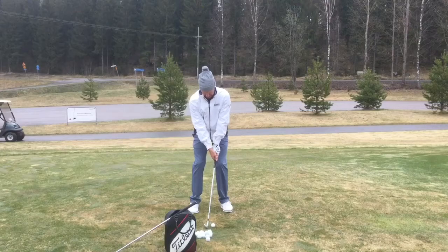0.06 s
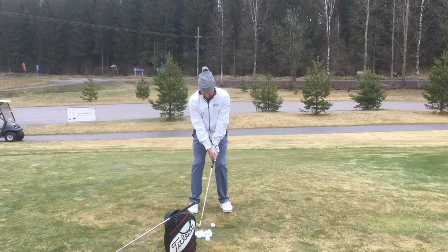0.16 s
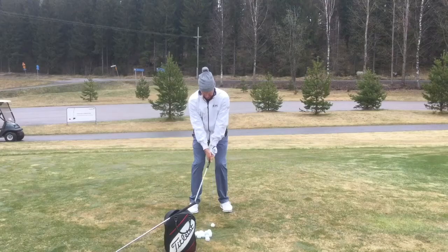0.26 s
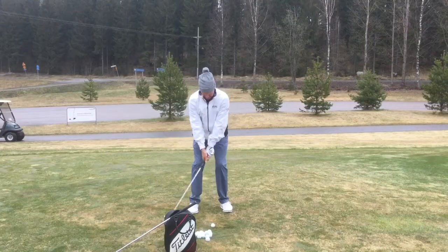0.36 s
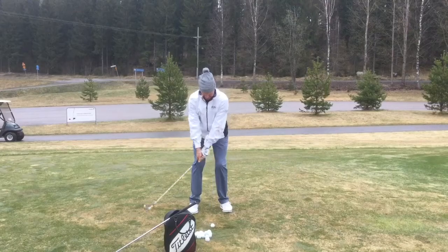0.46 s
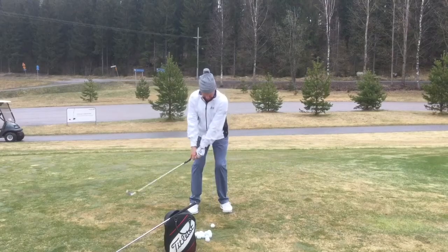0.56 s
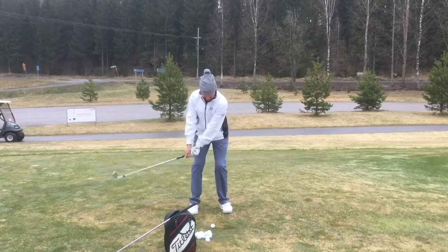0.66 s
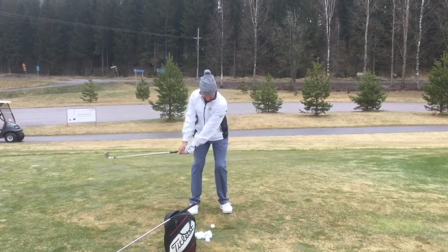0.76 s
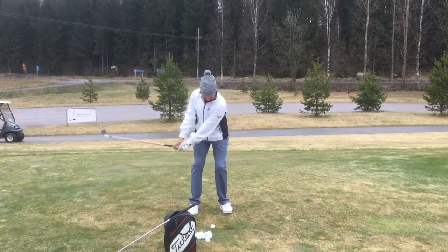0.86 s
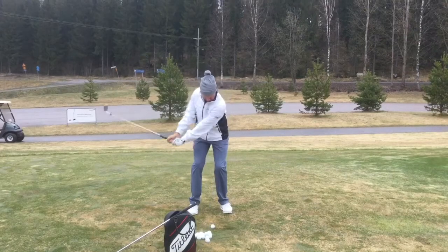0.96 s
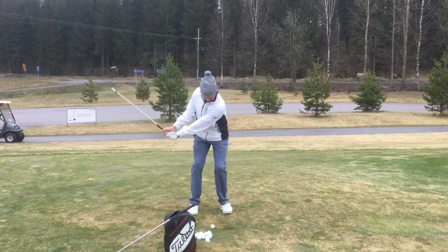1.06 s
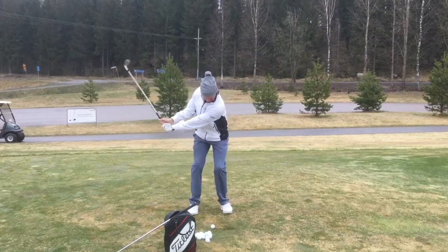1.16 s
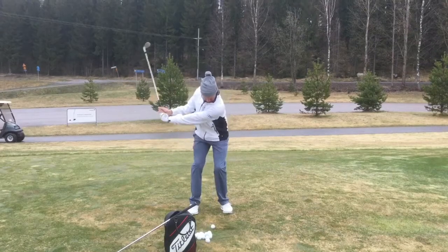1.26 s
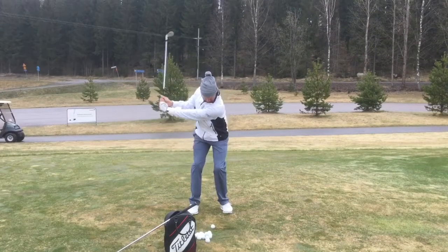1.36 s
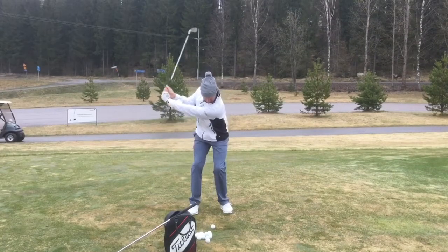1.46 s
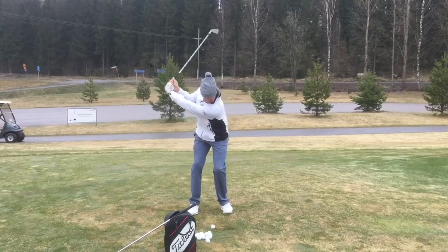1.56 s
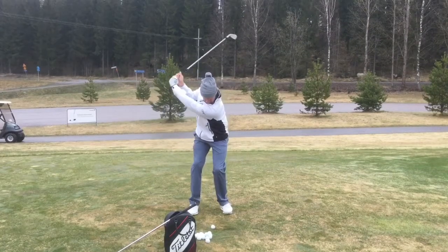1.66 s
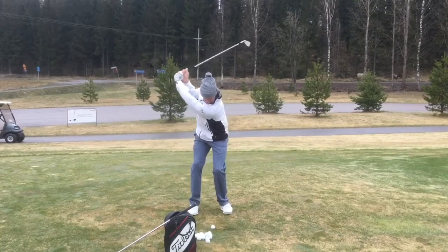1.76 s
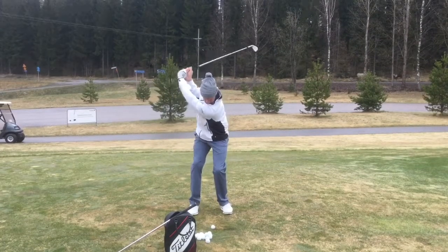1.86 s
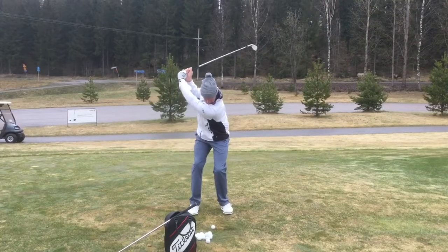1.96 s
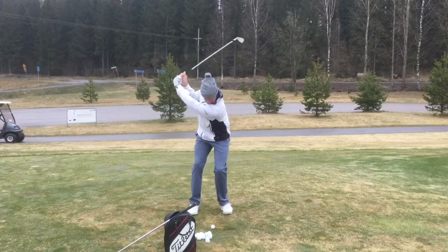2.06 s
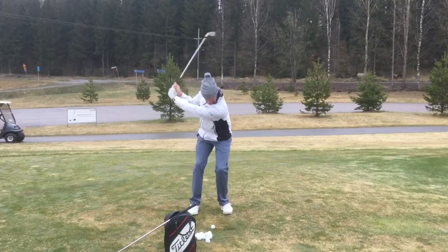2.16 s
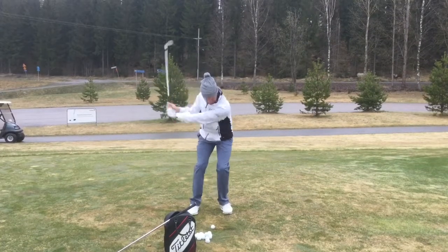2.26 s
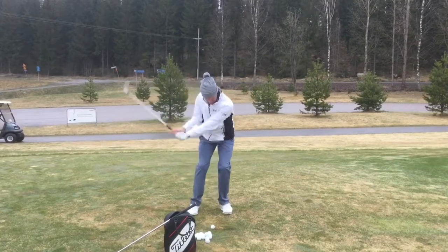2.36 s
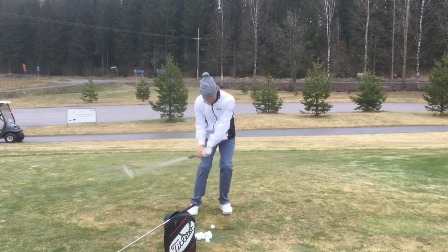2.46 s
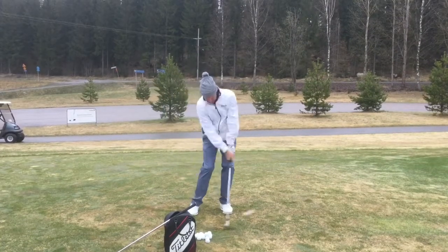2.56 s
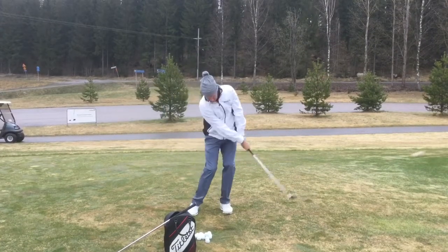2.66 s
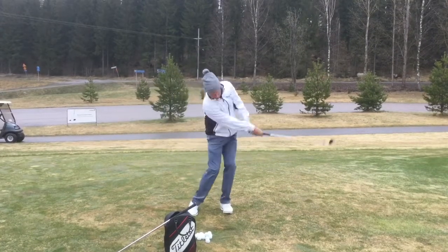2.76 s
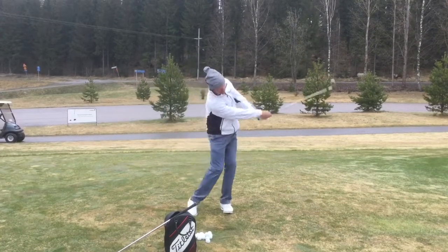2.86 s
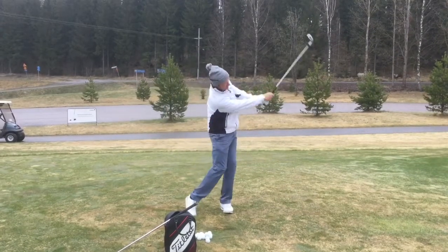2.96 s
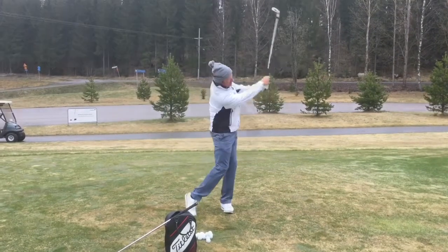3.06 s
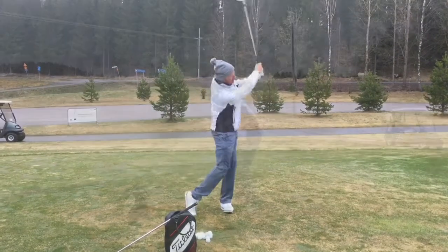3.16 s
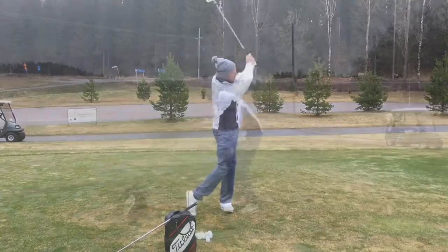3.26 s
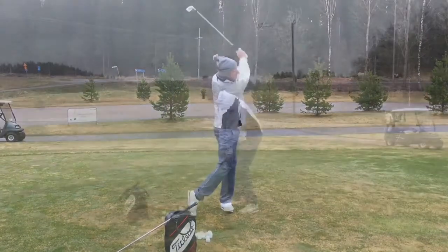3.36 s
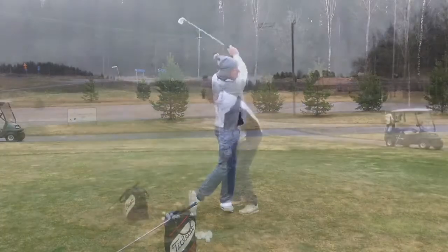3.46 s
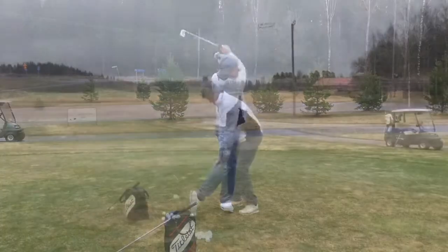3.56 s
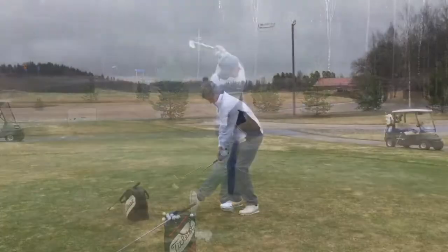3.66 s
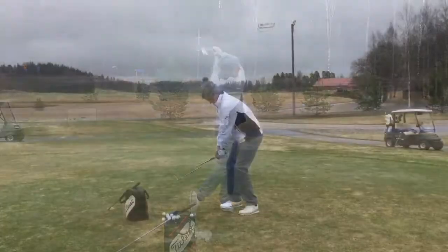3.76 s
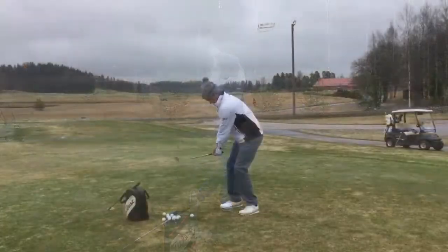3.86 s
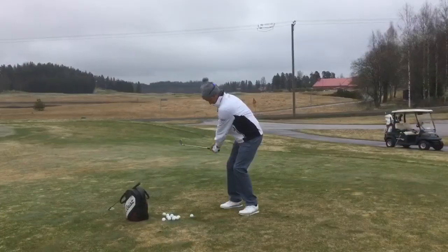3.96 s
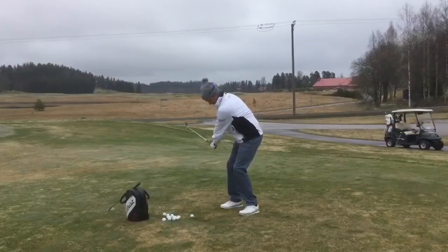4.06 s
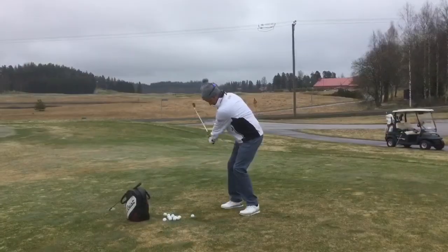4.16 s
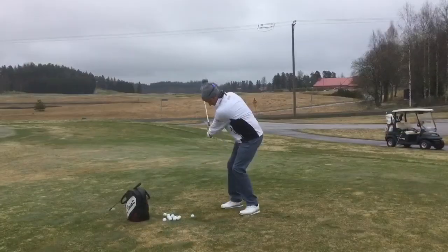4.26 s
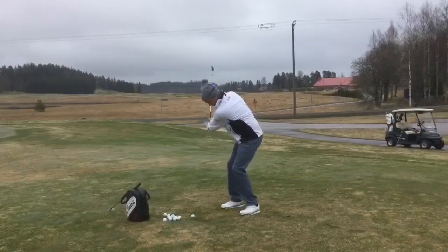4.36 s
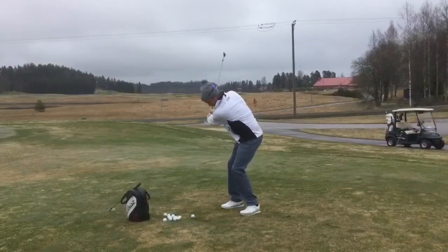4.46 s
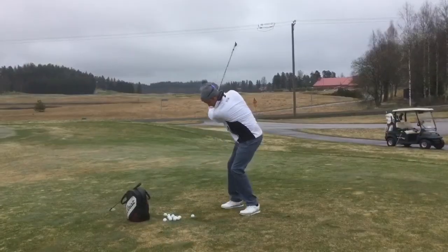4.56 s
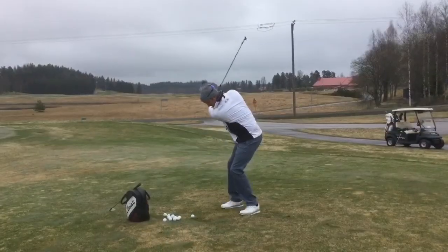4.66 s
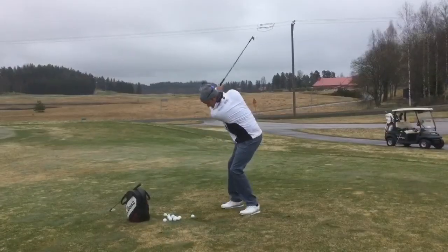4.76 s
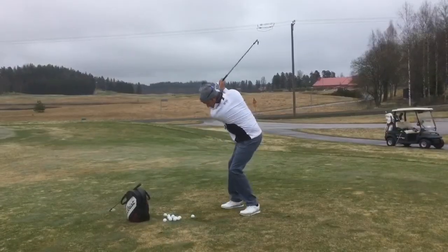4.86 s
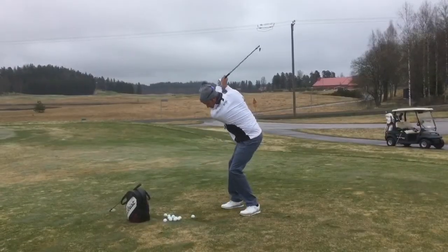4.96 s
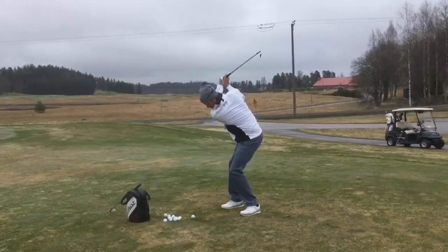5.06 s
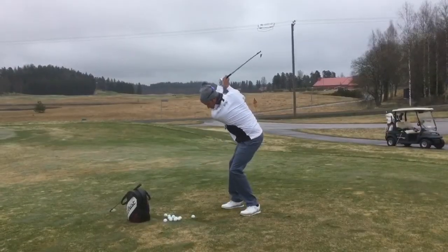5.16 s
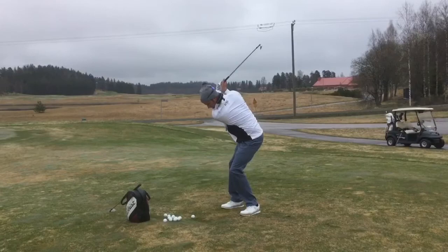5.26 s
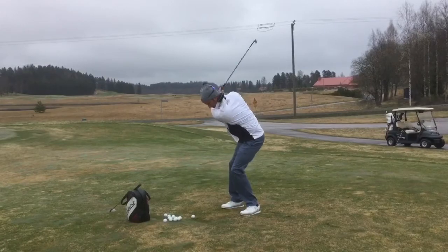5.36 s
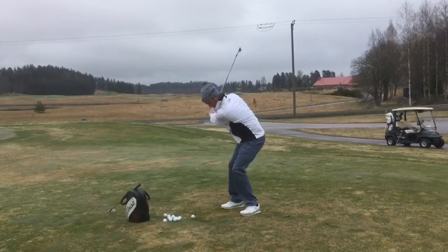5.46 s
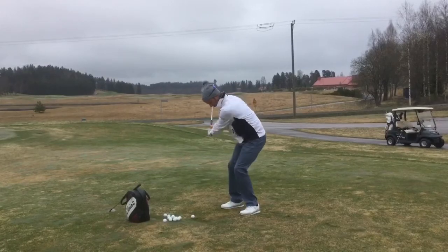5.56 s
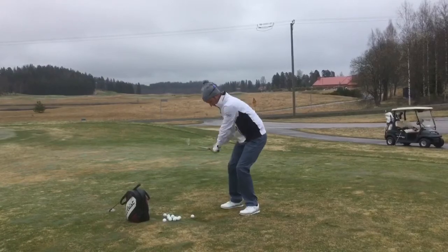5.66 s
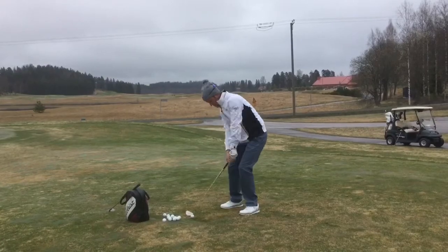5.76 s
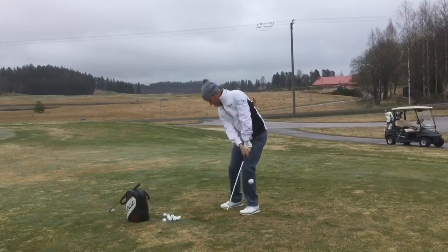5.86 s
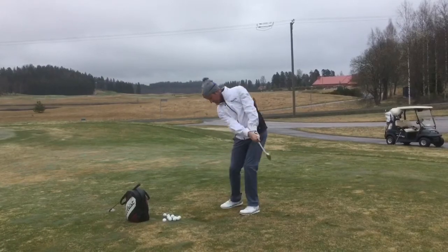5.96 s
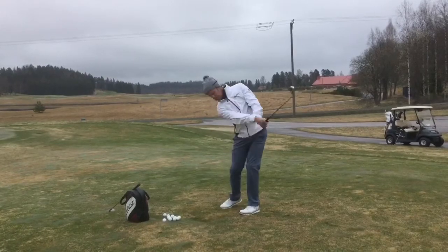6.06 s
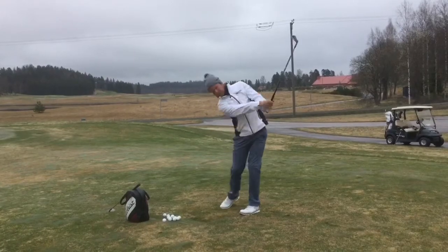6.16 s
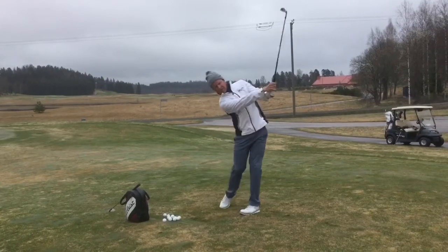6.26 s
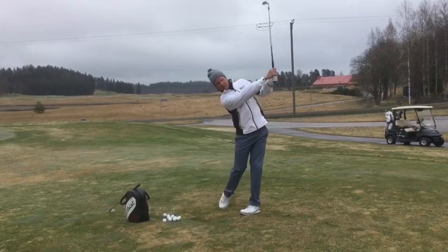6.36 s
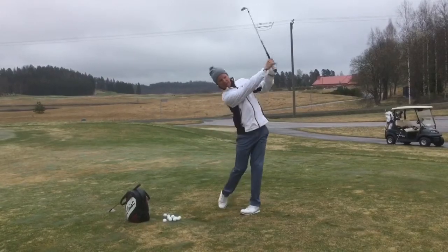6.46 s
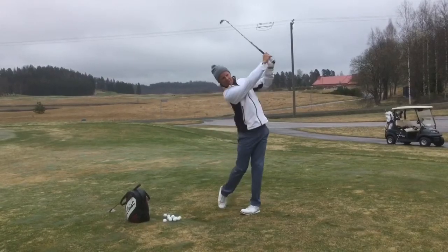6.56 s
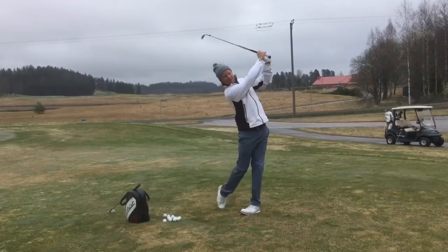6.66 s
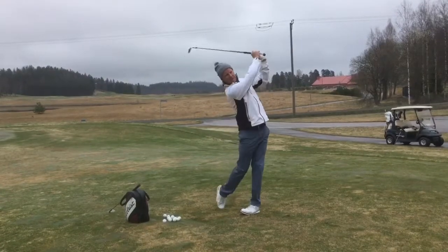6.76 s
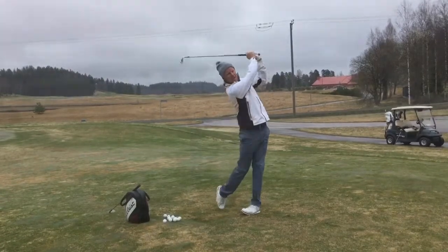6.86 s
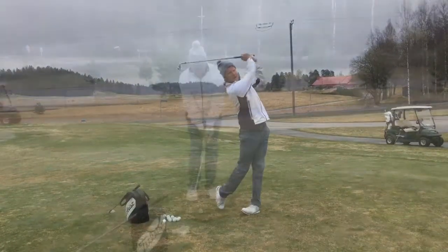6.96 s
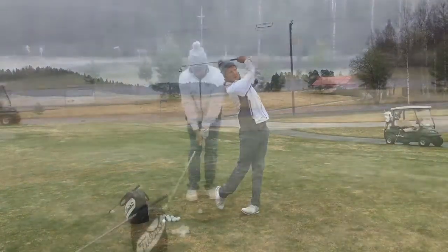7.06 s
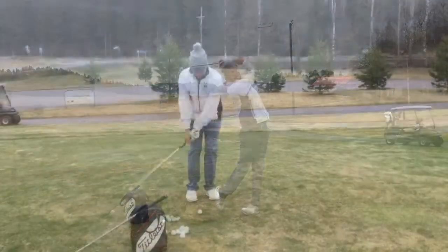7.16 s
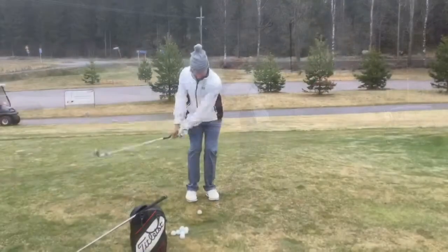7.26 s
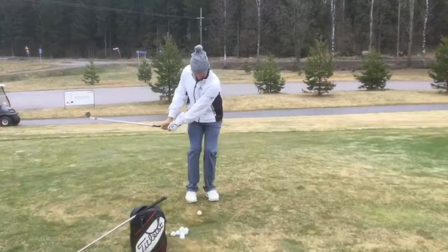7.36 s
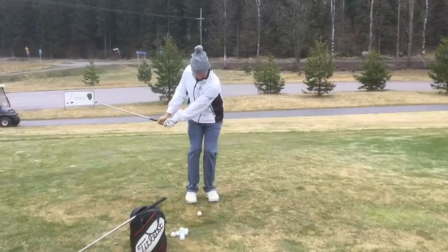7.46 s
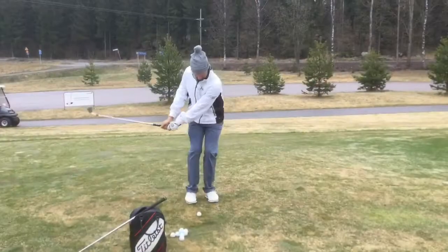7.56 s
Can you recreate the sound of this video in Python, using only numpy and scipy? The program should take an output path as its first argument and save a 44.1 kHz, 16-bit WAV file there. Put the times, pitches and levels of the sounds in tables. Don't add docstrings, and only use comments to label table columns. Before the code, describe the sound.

After a very brief silence the sound fades in on an open golf range: a close songbird pours out rapid slurs, chips and buzzy notes until about 1.5 s, while wind bumps the microphone in irregular low thumps over soft hiss and clothing rustle. At 1.85 s a neighbour's shot cracks, smaller and further off. Sparse distant bird notes follow. A swish and brief grass scuff lead to a near iron strike at 2.66 s: sharp ringing crack, turf thud, short echoes. From 3.05 to 4.15 s wind gives way to a steady low engine drone, deep rumble and swelling tyre roar, with faint high bird ticks. A tiny distant tick at 5.73 s precedes a scuff and the loudest snap at 5.89 s, drier and fuller, with quick echoes. From 6.9 s traffic fades to a quieter distant hush, and faint bird chirps return until the end near 7.6 s.

```python
import sys
import numpy as np
from scipy import signal
from scipy.io import wavfile
from scipy.ndimage import uniform_filter1d

SR = 44100
rng = np.random.default_rng(int(sys.argv[2]) if len(sys.argv) > 2 else 0)


def gain_from_db(level_db):
    decades = np.asarray(level_db, float) / 20
    return 10 ** decades


def store_wav(level_fs):
    pcm = np.round(np.clip(np.atleast_2d(level_fs), -1, 1) * 32767)
    wavfile.write(sys.argv[1], SR, pcm.T.astype(np.int16))


N = 334997
OPEN_IN_S, OPEN_OUT_S = (3.05, 4.16), (6.9, 7.365)


def evened(x):
    return x / np.sqrt(np.mean(x ** 2) + 1e-20)


def smoothed(x, width):
    return uniform_filter1d(uniform_filter1d(x, width), width)


def add(mix, s, sound):
    part = mix[round(s * SR):][:len(sound)]
    part += sound[:len(part)]


def fader(rows):
    s, db = np.transpose(rows)
    return gain_from_db(np.interp(np.arange(N) / SR, s, db))


def noise(tone, size, patchy_db, flicker_db):
    frames, hz = 4 * N // size + 5, np.fft.rfftfreq(size, 1 / SR)
    a, b, patches = rng.standard_normal((frames, len(hz), 3)).T
    patches = evened(uniform_filter1d(uniform_filter1d(patches, 8, 0), 10, 1))
    flicker = evened(uniform_filter1d(rng.standard_normal(frames), 4))
    f, db = np.transpose(tone)
    colour_db = np.interp(np.log(hz + 1), np.log(f), db, left=-90, right=-90)[:, None]
    z = (a + 1j * b) * gain_from_db(colour_db + patchy_db * patches + flicker_db * flicker)
    return evened(signal.istft(z, nperseg=size, noverlap=3 * size // 4)[1][:N])


def trees(x, t60):
    taps = np.zeros(SR // 2)
    at = np.arange(80, len(taps) - 20, 20)
    at = at + rng.integers(0, 20, len(at))
    taps[at] = rng.choice([-1., 1.], len(at)) * gain_from_db(-60 * at / SR / t60)
    return signal.fftconvolve(x, taps / np.linalg.norm(taps))[:N]


def openness():
    return np.interp(np.arange(N) / SR, OPEN_IN_S + OPEN_OUT_S, [0, 1, 1, 0])


def layer(sheltered_db, open_db, drift_db, share):
    # (time [s], level [dB])
    traffic = [(3.5, -1), (4.1, 0), (4.5, 1.2), (4.9, 0.3), (5.3, 3), (5.65, -1), (6.04, 2.5), (6.27, -1),
               (6.7, 1), (7.0, 1), (7.3, -3.5)]
    t = np.arange(N) / SR
    there = gain_from_db(open_db + drift_db * (t - 5.5)) * fader(traffic) ** share
    return np.hypot((1 - openness()) * gain_from_db(sheltered_db), openness() * there)


def hiss():
    # (frequency [Hz], density [dB per Hz])
    hiss_tone = [(300, 1.5), (1500, 9.5), (3000, 4.5), (6000, -0.5), (9000, -3.5), (12000, -5),
                 (14500, -8.5), (16000, -21.5)]
    # (peak [s], rise [s], fall [s], level [dB])
    rustles = [
        (1.4, .5, 0.55, -72.5),
        (2.6, 0.27, 0.48, -70),
        (4.55, 0.34, 0.66, -74),
        (5.959, .25, 0.19, -72.5),
        (6.651, .4, .3, -76),
        (7.349, 0.073, 0.16, -74),
    ]
    t = np.arange(N) / SR
    power = gain_from_db(2 * -78)
    for s, rise, fall, db in rustles:
        power = power + gain_from_db(2 * db) * np.exp(-((t - s) / np.where(t < s, rise, fall)) ** 2)
    return np.sqrt(power) * noise(hiss_tone, size=512, patchy_db=1.3, flicker_db=0.66)


def far_road():
    # (frequency [Hz], density [dB per Hz])
    hush_tone = [(600, -22.5), (950, -6.5), (1280, 1), (1550, -7), (2200, -26)]
    late = np.arange(N) / SR > OPEN_OUT_S[0]
    gain = (1 - openness()) * gain_from_db(np.where(late, -73.5, -79))
    return gain * noise(hush_tone, size=1024, patchy_db=1.0, flicker_db=1.0)


def engine():
    # (frequency [Hz], level [dB])
    engine_lines = [
        (105.8, 1.5),
        (159, -14.5),
        (275, -27.5),
    ]
    hum_hz = 52.5
    slow = [evened(smoothed(rng.standard_normal(N), 3000)) for _ in range(5)]
    t = np.cumsum(1 + .009 * slow[4]) / SR
    lines = np.zeros(N)
    for k, (hz, db) in enumerate(engine_lines):
        lines += gain_from_db(db + 1.4 * slow[k]) * np.sin(2 * np.pi * hz * t)
    hum = gain_from_db(slow[3]) * np.sin(2 * np.pi * hum_hz * np.cumsum(1 + 0.0041 * slow[3]) / SR)
    return np.sqrt(2) * (layer(-98.5, -49, -1.35, -0.5) * lines + layer(-67, -52, -2.5, 0.4) * hum)


def road():
    # (frequency [Hz], density [dB per Hz])
    rumble_tone = [(30, -45), (45, -15), (70, -2), (100, 1), (140, -4.5), (185, -15), (300, -29.5),
                   (400, -42)]
    # (frequency [Hz], density [dB per Hz])
    body_tone = [(180, -21), (270, -2), (340, -3.5), (400, -8.5), (550, -2), (750, -1), (950, -12.5),
                 (1300, -37)]
    # (frequency [Hz], density [dB per Hz])
    roar_tone = [(500, -36), (700, -13), (900, -9.5), (1060, 2), (1300, -5.5), (1700, -13), (3100, -33),
                 (5000, -38)]
    # (frequency [Hz], density [dB per Hz])
    sizzle_tone = [(1300, -24.5), (1900, 2.5), (2600, -3), (3600, -14.5), (5500, -34.5)]
    t = np.arange(N) / SR
    late = (1 - openness()) * (t > OPEN_OUT_S[0])
    rumble = layer(-89, -47, 1.63, 0) * noise(rumble_tone, size=2048, patchy_db=2.0, flicker_db=1.0)
    body = layer(-81, -67, 3.5, 1) * noise(body_tone, size=1024, patchy_db=2.5, flicker_db=2.0)
    body *= gain_from_db(3.5 * late)
    lorry = gain_from_db(6.5 * np.exp(-((t - 4.04) / 0.3) ** 2))
    sizzle = layer(-100, -76, -2, 0.7) * lorry * noise(sizzle_tone, size=512, patchy_db=3.0, flicker_db=0.0)
    roar = layer(-82, -54.5, 1.7, 0.76) * noise(roar_tone, size=1024, patchy_db=2.2, flicker_db=0.76)
    roar *= gain_from_db(9 * late ** 4)
    return rumble + body + sizzle + roar


def wind():
    # (time [s], level [dB])
    strength = [(.1, -49.5), (.3, -55), (.48, -47.5), (.6, -49), (.67, -58), (.8, -51), (1, -49.5),
                (1.3, -53), (1.85, -51), (2.3, -53.5), (2.65, -50), (2.95, -52), (3.5, -49.5), (7.1, -61),
                (7.6, -60)]
    # (frequency [Hz], density [dB per Hz])
    wind_tone = [(20, -41.5), (32, -13.5), (50, -1), (97, 1.5), (125, -6.5), (190, -18), (380, -34),
                 (600, -60.5)]
    # (centre [s], peak [dB], length [ms])
    buffets = [(.101, -36, 4.6), (.175, -33, 8.2), (.517, -29.5, 3.6), (.529, -36, 3.6),
               (0.597, -35.5, 11.5), (.609, -29.5, 5.6), (.888, -30, 4.3), (.905, -37, 24),
               (0.947, -37, 4.2), (.966, -40, 4.7), (.984, -39, 7), (1, -32.5, 11), (1.022, -27, 6),
               (1.213, -37, 3.8), (1.35, -37, 3.5), (1.395, -41, 3.5), (1.624, -41.5, 25),
               (1.684, -35.5, 9.8), (1.885, -34.5, 4.6), (1.97, -37, 9), (2.049, -27, 8.6),
               (2.091, -33.5, 7.8), (2.526, -38, 19), (2.72, -34, 6.3), (2.803, -35.5, 12),
               (3.196, -38.5, 13.5), (3.241, -37, 11), (3.317, -38, 14), (3.333, -38, 7.2),
               (3.361, -43.5, 19)]
    # (time [s], peak [dB])
    gusts = [(0.091, -53), (.167, -45), (.465, -54), (0.501, -42), (.6, -55), (0.875, -54), (.94, -54),
             (1.012, -49), (1.232, -56), (1.21, -51), (1.316, -51.5), (1.343, -52), (1.372, -47),
             (1.548, -54), (1.848, -57), (1.892, -51.5), (2.172, -55.5), (2.221, -51.5)]
    slow_hz, quick_hz, quick_ms, eddy_hz = 86, 152, 6.9, 268
    out = fader(strength) * (1 - 0.57 * openness())
    out *= noise(wind_tone, size=2048, patchy_db=2.0, flicker_db=1.5)
    t = np.arange(-1500, 1500) / SR
    for s, db, ms in buffets:
        hz = slow_hz + (quick_hz - slow_hz) * np.exp(-ms / quick_ms)
        swing = np.cos(2 * np.pi * (hz * t + rng.random()))
        add(out, s + t[0], gain_from_db(db - 1.0) * np.exp(-2.8 * (1000 * t / ms) ** 2) * swing)
    for s, db in gusts:
        eddy = np.exp(-(t / 0.0046) ** 2) * np.sin(2 * np.pi * eddy_hz * t)
        add(out, s + 0.0072 + t[0], gain_from_db(db - 3.0) * eddy)
    return out


def whistle(s, length, start_hz, middle_hz, end_hz, db):
    u = np.linspace(0, 1, round(length * SR))
    hz = start_hz * (1 - u) * (1 - 2 * u) + 4 * middle_hz * u * (1 - u) + end_hz * u * (2 * u - 1)
    shake, wobble = (evened(smoothed(rng.standard_normal(6000), 70))[:len(u)] for _ in range(2))
    hz = hz * (1 + .009 * wobble)
    lift_db = 4.5 * np.log2(hz / hz.mean())
    gain = gain_from_db(db + 3.0 + 2.8 * shake + lift_db)
    return s, gain * signal.windows.tukey(len(u), .35) * np.sin(2 * np.pi * np.cumsum(hz) / SR)


def buzz(s, length, low_hz, high_hz, db):
    t = np.arange(round(length * SR)) / SR
    turn = (t * 160) % 1
    hz = high_hz + (low_hz - high_hz) * turn
    swell = (0.3 + 0.65 * t / length) * signal.windows.tukey(len(t), .3)
    return s, gain_from_db(db) * swell * np.sin(np.pi * turn) * np.sin(2 * np.pi * np.cumsum(hz) / SR)


def birds():
    # (time [s], length [s], start [Hz], end [Hz], level [dB])
    slurs = [(0.055, .038, 2850, 4250, -60.5), (0.06, 0.02, 4080, 5000, -68), (0.158, .02, 3680, 2800, -63),
             (.185, .03, 2770, 2810, -73), (0.211, 0.035, 2895, 4250, -61), (0.213, 0.03, 3750, 4500, -68),
             (0.313, 0.015, 3550, 2850, -61.5), (.33, .025, 2800, 2250, -70),
             (0.352, 0.02, 2290, 2900, -69), (0.37, 0.036, 2950, 4250, -59),
             (0.404, 0.027, 3820, 5220, -67.5), (0.461, .012, 5400, 6500, -73),
             (.469, .024, 6400, 6380, -76), (.778, .02, 2500, 2950, -73), (.93, .018, 3500, 4500, -72),
             (1.112, .012, 2450, 3000, -75), (.494, .015, 4910, 5000, -65), (.512, .012, 5080, 4600, -69),
             (0.572, 0.013, 5050, 4900, -66), (0.242, .016, 4500, 5250, -67),
             (0.669, 0.035, 2110, 2840, -70.5), (.705, 0.033, 2800, 3310, -61),
             (0.745, 0.034, 3300, 2160, -66), (0.903, 0.024, 4250, 2790, -62),
             (0.929, 0.017, 2970, 3950, -62), (0.968, 0.016, 2810, 2220, -69),
             (1.044, .011, 2350, 2340, -69), (1.064, .012, 2200, 2300, -72),
             (1.091, 0.015, 5600, 3020, -69), (1.108, .012, 3050, 3000, -72),
             (1.12, 0.018, 3100, 4330, -72), (1.426, .02, 3520, 2950, -63.5),
             (1.444, 0.015, 2940, 2100, -69)]
    # (time [s], length [s], start [Hz], end [Hz], level [dB])
    far_slurs = [(2.095, .035, 3850, 3500, -82), (2.13, .055, 3500, 3870, -81),
                 (1.662, .025, 2150, 1800, -77), (2.31, .02, 2700, 2000, -72),
                 (2.324, .072, 3280, 2790, -68), (2.408, .016, 2660, 2650, -75),
                 (2.43, .06, 2670, 2600, -75), (2.362, .014, 4450, 4100, -78),
                 (2.36, .022, 2280, 2100, -78), (1.27, .035, 3050, 2950, -81),
                 (2.543, .08, 2950, 3350, -76), (2.555, .09, 3380, 3720, -80),
                 (3.304, .054, 6380, 4600, -86), (3.48, .05, 5900, 5110, -92),
                 (4.838, .035, 10250, 9900, -88), (4.9, .04, 9400, 9250, -91),
                 (4.936, .014, 11600, 11550, -88), (4.94, .073, 10230, 10780, -87),
                 (5.025, .02, 10330, 9980, -88), (5.072, .045, 9220, 9000, -88),
                 (7.345, .038, 4550, 4300, -82), (7.39, 0.018, 3550, 3500, -68),
                 (7.417, .014, 3500, 3490, -71), (7.45, 0.028, 2380, 2280, -79),
                 (7.245, .02, 2400, 2250, -79), (7.21, 0.025, 3400, 3450, -81),
                 (7.44, 0.077, 3480, 3500, -82), (7.408, 0.046, 3180, 2950, -74),
                 (7.54, 0.045, 2300, 2330, -76.5), (7.225, .03, 3050, 2900, -79)]
    # (time [s], length [s], top [Hz], end [Hz], level [dB])
    arches = [(0.582, 0.048, 3570, 2580, -66.5), (0.768, 0.048, 3330, 2120, -69.5),
              (.955, 0.0445, 3200, 2800, -66), (.694, .012, 4950, 4000, -73),
              (1.149, .046, 3100, 2300, -67.5), (7.183, 0.041, 3020, 3100, -72),
              (1.168, .03, 5200, 4300, -76), (.905, .017, 4550, 3700, -70)]
    # (time [s], start [Hz], end [Hz], level [dB])
    chips = [(.088, 4260, 3940, -63), (.093, 6100, 4600, -74), (.144, 5120, 4380, -64),
             (.152, 4450, 4550, -74), (.181, 6300, 5100, -83), (.19, 4700, 6000, -82),
             (.268, 6400, 4450, -72.5), (.295, 4950, 4300, -64.5), (.304, 4490, 4590, -70),
             (.356, 6300, 5000, -81), (.366, 5000, 6200, -78), (.441, 6900, 4900, -74),
             (.472, 7240, 7500, -79), (.488, 6300, 4900, -73), (.524, 4700, 5700, -71),
             (.529, 5600, 4300, -70), (.539, 3600, 2900, -74), (.546, 5400, 5900, -71),
             (.555, 3770, 4260, -72), (.562, 5600, 6400, -72), (.571, 6520, 5200, -73),
             (.706, 4400, 5600, -74), (.713, 5600, 3000, -71), (.738, 2990, 3500, -65),
             (.741, 3370, 4350, -72), (.895, 3700, 5600, -66), (.946, 3980, 2790, -65),
             (1.075, 4780, 4250, -69), (1.087, 4000, 5630, -71), (1.171, 3500, 4250, -69),
             (1.194, 3900, 3000, -73), (1.311, 5430, 5270, -65), (7.382, 4220, 3550, -76)]
    # (time [s], length [s], low [Hz], high [Hz], level [dB])
    buzzes = [(0.175, 0.039, 2300, 3104, -57.5), (0.327, 0.039, 2195, 2920, -61),
              (0.85, 0.047, 4000, 5200, -62), (1.276, 0.035, 5100, 6400, -60),
              (1.377, 0.048, 3300, 3900, -66), (0.984, 0.052, 2200, 3100, -64),
              (1.288, .03, 6200, 7500, -72), (.058, .075, 2600, 2950, -70), (1.372, .05, 3850, 4300, -70)]
    chip_s = 0.0109
    song, far = np.zeros(N), np.zeros(N)
    for mix, rows in [(song, slurs), (far, far_slurs)]:
        for s, length, a_hz, b_hz, db in rows:
            middle_hz = min(a_hz, b_hz) + .36 * abs(b_hz - a_hz)
            add(mix, *whistle(s, length, a_hz, middle_hz, b_hz, db))
    for s, length, top_hz, end_hz, db in arches:
        add(song, *whistle(s, length, .86 * top_hz, top_hz, end_hz, db))
    for s, a_hz, b_hz, db in chips:
        add(song, *whistle(s, chip_s, a_hz, (a_hz + b_hz) / 2, b_hz, db))
    for k in range(6):
        for hz in (4000, .85 * 4000):
            add(song, *whistle(3.62 + k * .074, chip_s, 1.07 * hz, hz, .95 * hz, -82))
    for row in buzzes:
        add(song, *buzz(*row))
    near = trees(gain_from_db(-5) * song + gain_from_db(-2) * far, t60=.06)
    wood = trees(gain_from_db(-6.5) * song + gain_from_db(-5) * far, t60=.5)
    return song + gain_from_db(-3) * far + near + wood


def swish():
    # (time [s], peak [dB])
    swings = [
        (2.6645, -64.5),
        (5.8916, -67),
    ]
    # (frequency [Hz], density [dB per Hz])
    swish_tone = [(600, -21.5), (1300, 0.5), (3500, -3), (7000, -9), (12000, -22)]
    t = np.arange(N) / SR
    gain = sum(gain_from_db(db + np.minimum(94.5 * (t - s), 98.5 * (s - t))) for s, db in swings)
    return gain * noise(swish_tone, size=256, patchy_db=2.0, flicker_db=0.16)


def ring(drive, modes):
    t = np.arange(1500) / SR
    answer = np.zeros(len(t))
    for k, (hz, width, db) in enumerate(modes):
        age = 1.55 * np.pi * width * t
        answer += (-1) ** k * gain_from_db(db) * width * age * np.exp(-age) * np.sin(2 * np.pi * hz * t)
    return signal.fftconvolve(drive, answer / abs(answer).max())


def snap(drive, modes):
    t = np.arange(1500) / SR
    answer = np.zeros(len(t))
    for delay_ms, snap_db in [(0, 0), (.478, -6.7)]:
        since = np.maximum(t - delay_ms / 1000, 0)
        for hz, width, db in modes:
            fade = np.exp(-np.pi * width * since)
            answer += gain_from_db(db + snap_db) * (1 - fade) * fade * np.cos(2 * np.pi * hz * since)
    answer = signal.lfilter(*signal.butter(3, 8800, fs=SR), answer)
    return signal.fftconvolve(drive, answer / abs(answer).max())


def thud(t, hz):
    return -(t * hz / .48) * np.exp(1 - t * hz / .45) * np.sin(2 * np.pi * hz * t)


def scuff(t, lead):
    # (frequency [Hz], width [Hz], level [dB])
    scuff_modes = [(2690, 520, -11), (4300, 410, -2.5), (6300, 410, -5), (9000, 560, -24),
                   (12200, 1800, -32)]
    drag = np.minimum(t / lead, 1) ** 2.5 * np.exp(-np.maximum(t - lead, 0) / 0.0066)
    return drag * evened(ring(rng.standard_normal(len(t)), scuff_modes))[:len(t)]


def spray(t):
    grit = np.diff(rng.standard_normal(len(t) + 2), 2)
    return grit * np.minimum(t / .0012, 1) * np.exp(-1000 * t / 4.9)


def strikes():
    # (time [s], turf thud [dB], thud pitch [Hz], scuff [dB], scuff lead [ms])
    hits = [
        (1.8519, -44, 138, -70, 3),
        (2.6645, -26, 195, -41.5, 13),
        (5.8921, -25.5, 400, -32.5, 20),
        (5.7344, -74, 410, -84, 3),
    ]
    # (delay [ms], level [dB])
    cracks = [
        [(0, -33.5), (3, -56)],
        [(0, -10), (4.3, -26), (8.5, -40.5)],
        [(0, -3.8), (4, -23), (7.3, -29), (15, -39)],
        [(0.0055, -53)],
    ]
    # (frequency [Hz], width [Hz])
    crack_dips = [
        [(1380, 230), (3980, 300)],
        [(2620, 120), (7500, 460), (11950, 300)],
        [(3380, 150), (7350, 200)],
        [(4400, 300)],
    ]
    # (frequency [Hz], width [Hz], level [dB])
    front = [(590, 200, -12), (1100, 250, -18.5), (1940, 550, -15), (2850, 300, -22), (3770, 266, -0.5),
             (4420, 250, -11.5), (4950, 250, -24), (5800, 600, -13), (6474, 220, -20), (8490, 660, -15.5),
             (9970, 330, -21), (10500, 250, -26), (12700, 1500, -32), (14300, 700, -35.5)]
    # (frequency [Hz], width [Hz], level [dB])
    behind = [(850, 400, -28), (1900, 2130, 0), (3950, 330, -12.6), (4510, 1560, -10), (5910, 650, -16.6),
              (6575, 150, -40), (7810, 680, -28), (8760, 500, -37)]
    # (frequency [Hz], width [Hz], level [dB])
    distant = [(990, 190, -6), (1800, 410, 3.5), (2700, 510, -10), (3550, 330, -2), (4830, 250, -16),
               (5350, 300, -11), (6040, 200, -24), (6900, 500, -23), (8600, 800, -27), (11000, 1500, -30)]
    sprays = [-70, -49, -52, -100]
    thud_delays = [-.2, 1.6, 2.6, 0]
    echo_floors = [3000, 1000, 3000, 3000]
    voices = [(ring, distant), (ring, front), (snap, behind), (ring, distant)]
    out, t = np.zeros(N), np.arange(1300) / SR
    for k, (s, thud_db, thud_hz, scuff_db, lead_ms) in enumerate(hits):
        voice, modes = voices[k]
        for delay_ms, db in cracks[k]:
            drive, heard = np.ones(1), modes
            if delay_ms:
                drive = rng.standard_normal(200) * np.exp(-t[:200] / 0.0007)
                heard = [m for m in modes if m[0] > echo_floors[k]]
            crack = voice(drive / np.linalg.norm(drive), heard)
            for hz, width in crack_dips[k]:
                crack = signal.lfilter(*signal.iirnotch(hz, hz / width, SR), crack)
            add(out, s + delay_ms / 1000, -gain_from_db(db) * crack)
        add(out, s + thud_delays[k] / 1000, gain_from_db(thud_db) * thud(t, thud_hz))
        lead = lead_ms / 1000
        add(out, s - lead, gain_from_db(scuff_db) * scuff(t, lead))
        add(out, s, gain_from_db(sprays[k]) * spray(t))
    out += swish()
    return out + gain_from_db(-41) * trees(out, t60=0.17)


def scene():
    return (hiss() + far_road() + engine() + road() + wind() + birds() + strikes())[None]


def low_pass(x):
    return signal.sosfilt(signal.butter(12, 15620, fs=SR, output="sos"), x)


def record(dry):
    fade = np.clip((np.arange(N) / SR - .044) / 0.077, 0, 1)
    cut = signal.sosfilt(signal.butter(4, 42, "high", fs=SR, output="sos"), dry * fade)
    cut = signal.oaconvolve(cut, signal.firwin(127, 15250, fs=SR)[None], "same")
    return low_pass(cut)


dry = scene()
out = record(dry)
store_wav(out)
```